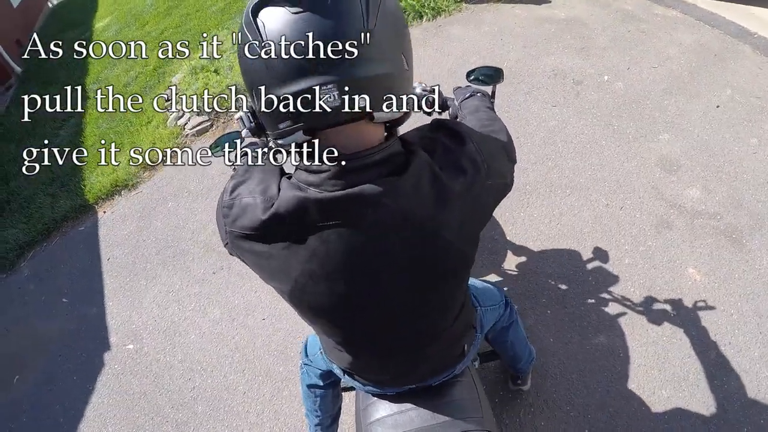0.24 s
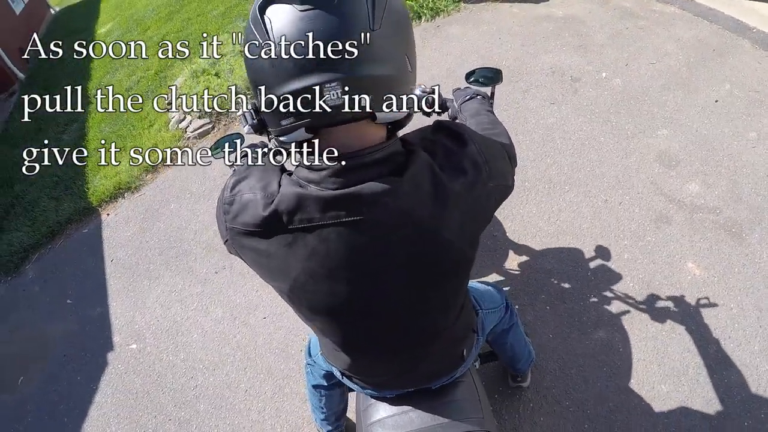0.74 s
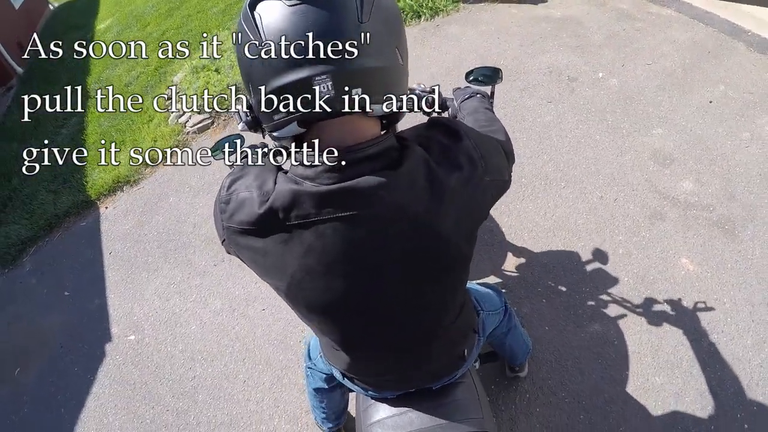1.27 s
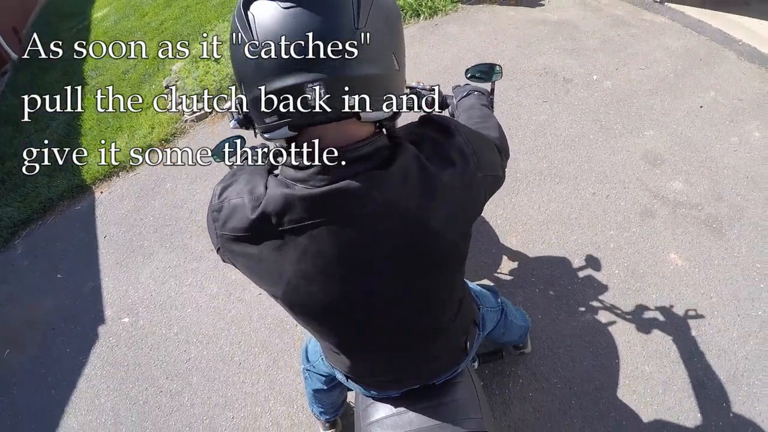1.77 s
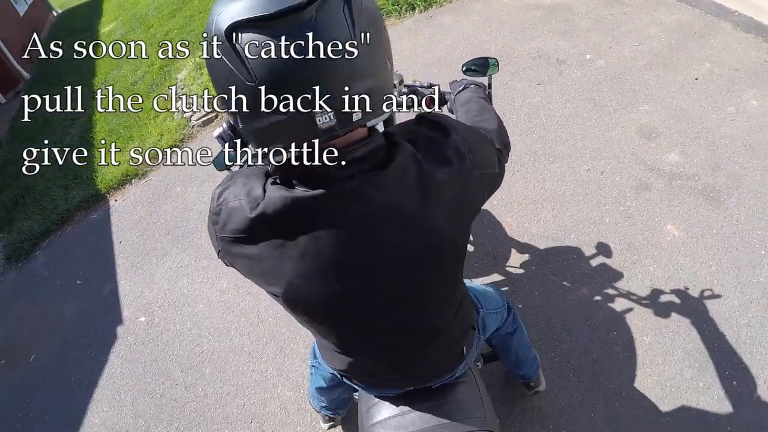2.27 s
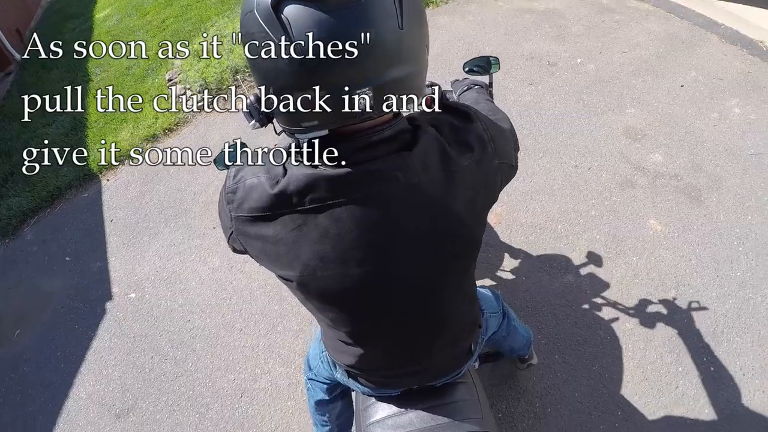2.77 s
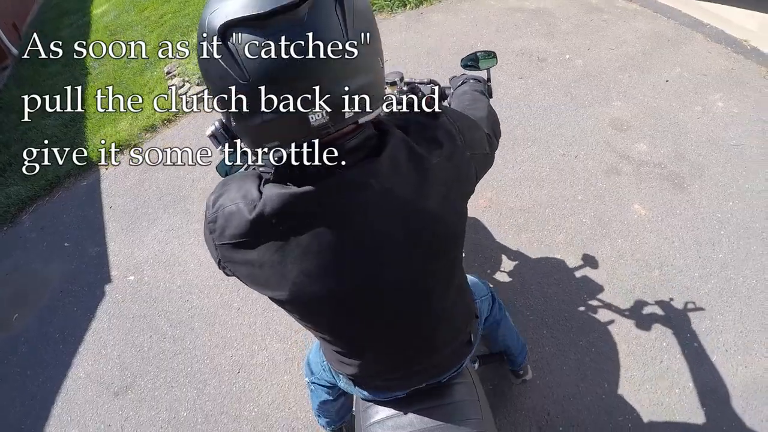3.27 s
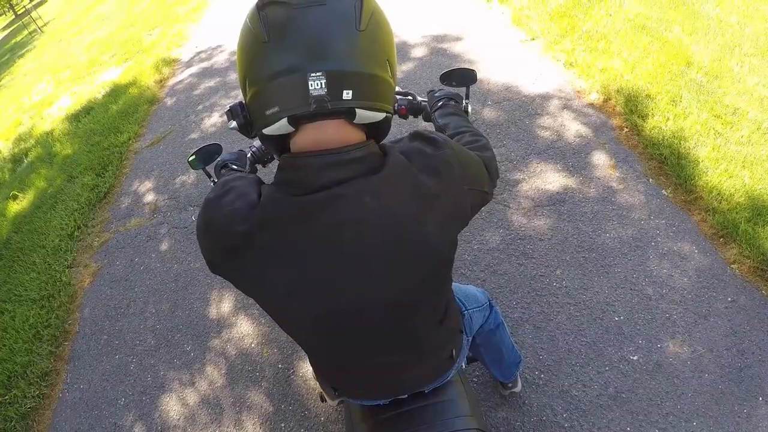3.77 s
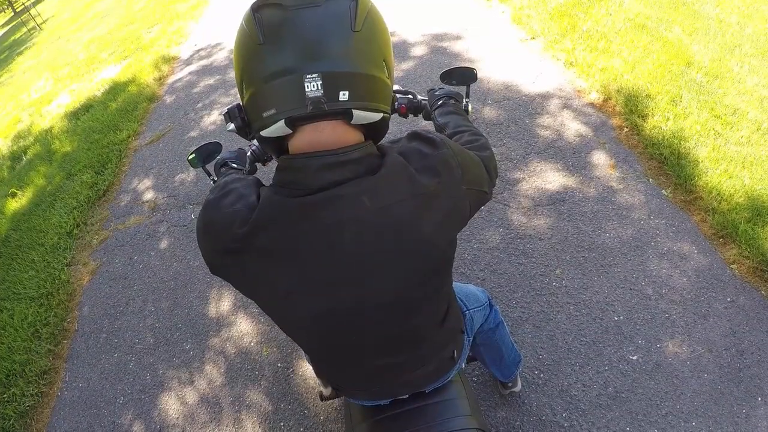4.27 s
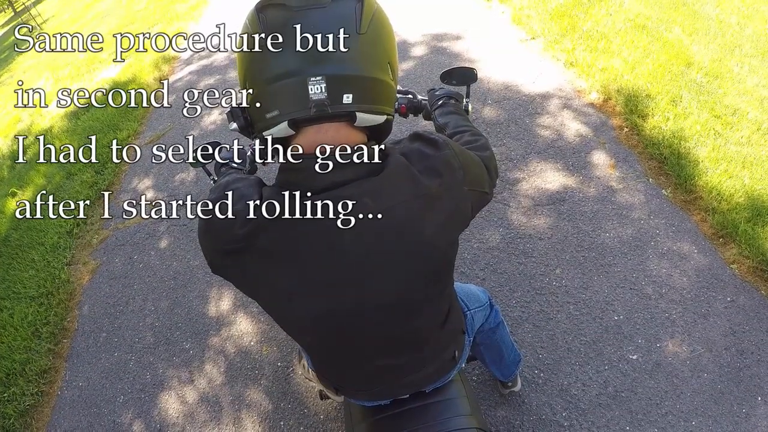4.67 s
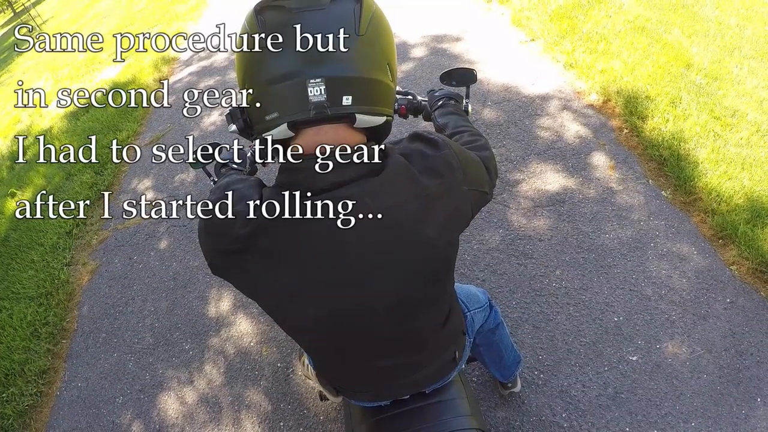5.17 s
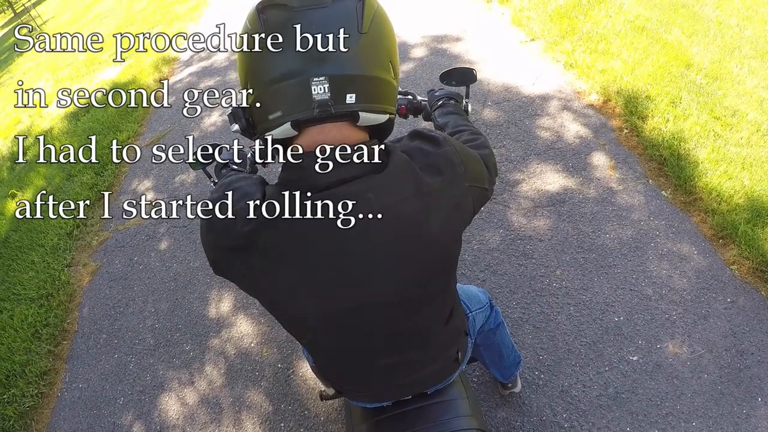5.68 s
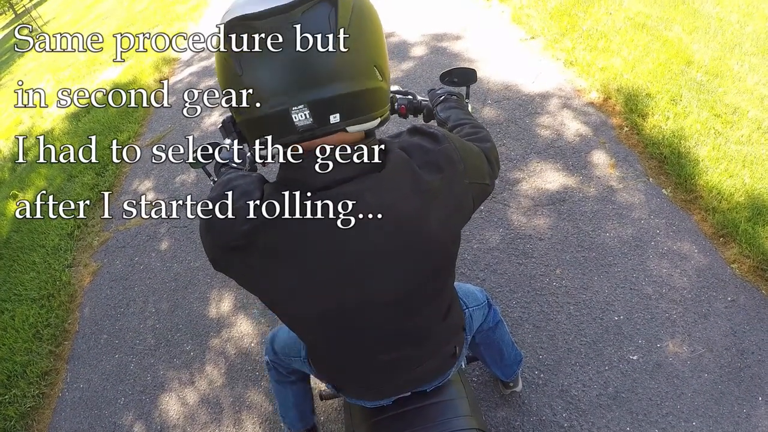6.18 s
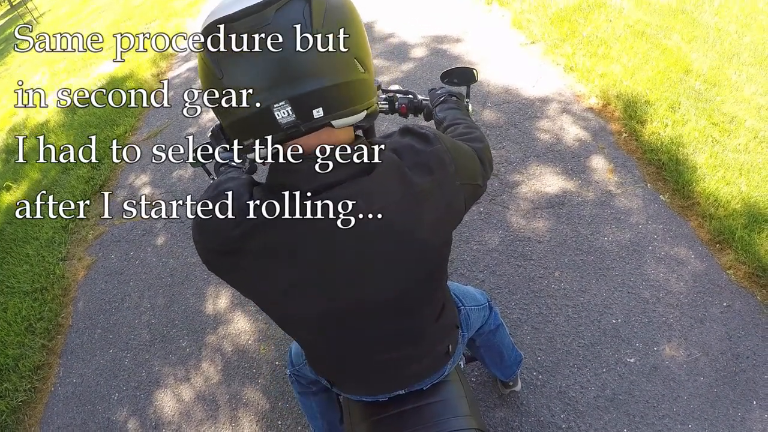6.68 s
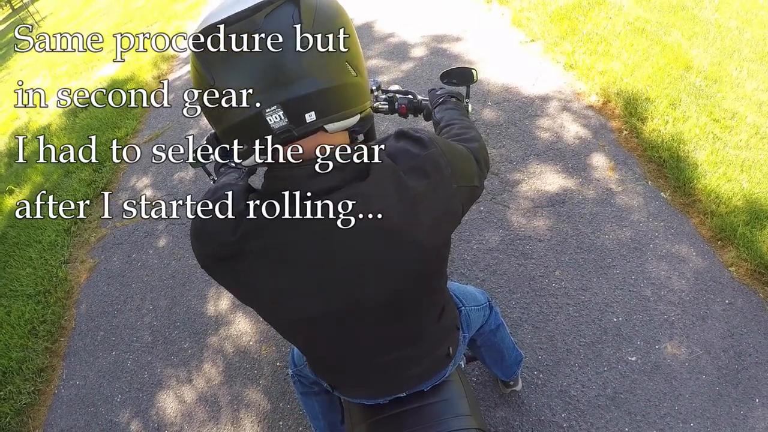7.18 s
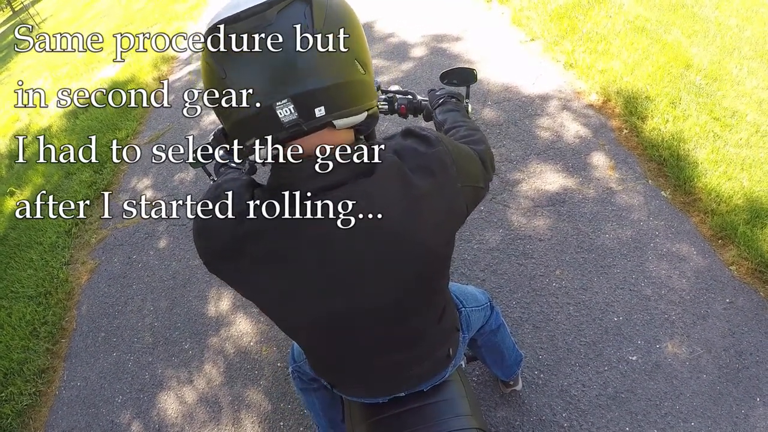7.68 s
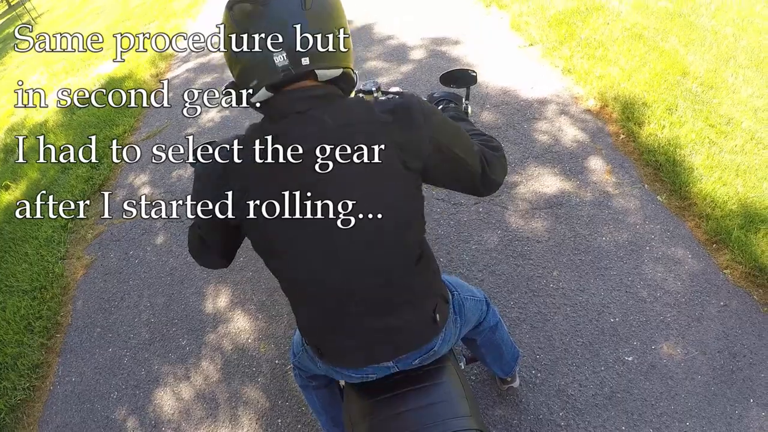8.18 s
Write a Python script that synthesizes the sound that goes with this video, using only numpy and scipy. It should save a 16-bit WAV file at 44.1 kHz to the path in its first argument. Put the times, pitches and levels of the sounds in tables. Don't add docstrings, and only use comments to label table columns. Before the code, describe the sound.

From 0 to 3.48 seconds a twin-cylinder motorcycle engine runs close to a microphone in a housing mounted on the bike. At first it is lumpy, one cylinder firing evenly about seven times a second while the other misfires; from around 0.3 seconds the throttle opens and by 1.5 the chug is fuller and steadier, nearly eight cycles a second. Deep thumps, gas hiss, small spits, clatter and hollow valve knocks mix. At 3.48 it cuts instantly to quiet: soft breeze, faint distant traffic, thin air hiss. Lever clicks come at 3.6-3.7 and 4.1, a strong gear pedal clunk with low frame thud at 4.9, smaller ticks until 5.4, one at 5.9, and a bright click at 7.8. Faint birds whistle and chirp throughout, with buzzy trills mainly after 7. A car swells weakly near 7.1. Jacket cloth rustles around 8.25 and 8.4.

```python
import sys
import numpy as np
from scipy import signal
from scipy.io import wavfile
from scipy.ndimage import uniform_filter1d

SR = 44100
rng = np.random.default_rng(int(sys.argv[2]) if len(sys.argv) > 2 else 0)


def materialize(psi):
    bounded = np.clip(np.atleast_2d(psi).T, -1, 1)
    quanta = np.round(bounded * 32767).astype(np.int16)
    wavfile.write(sys.argv[1], SR, quanta)


def gain_from_db(level_db):
    decades = np.asarray(level_db, float) / 20
    return 10 ** decades


N = 371746
CUT_S = 3.4802

# (front blast time [s], rear blast pressure [relative, negative = misfire sucks gas back],
# valve knock before the front blast [dB], light knock after it [dB])
ENGINE_CYCLES = [(-.1195, 2.2, -40, -40), (.0176, -1.22, -36, -34), (.1554, -.95, -36.5, -34),
                 (.3084, 1.26, -25.5, -33), (.4357, -1.23, -30.5, -32), (.5607, .33, -31, -37.5),
                 (.7007, 1.37, -28.5, -31), (.8333, -1.09, -25.5, -34.5), (.9657, 1.14, -29, -27),
                 (1.095, -1.21, -21, -29), (1.2218, 1.15, -26, -33.5), (1.3491, -.97, -27, -38),
                 (1.4825, 1.27, -25, -28), (1.6133, .44, -27, -32), (1.74, .86, -27.5, -34.5),
                 (1.8686, .72, -27.5, -38), (1.9976, .98, -23.5, -36), (2.1261, .89, -28.5, -34),
                 (2.2513, .58, -27, -35.5), (2.3793, .93, -26, -40), (2.5063, .3, -26, -28.5),
                 (2.632, .88, -30, -32), (2.7608, .92, -24, -27.5), (2.887, .27, -21.5, -29.5),
                 (3.0144, 1.02, -27, -42), (3.1419, .86, -22.5, -34.5), (3.2661, .38, -23, -41),
                 (3.393, 1.08, -26.5, -28.5)]
# (frequency [Hz], width [Hz], level [dB])
HOUSING_MODES = [(656, 83, -17.5), (707, 53.3, 5.5), (802, 157, -6), (1124.6, 45, -4.5), (1330, 29, -18.5),
                 (1558, 25, -4.5), (1876, 19, -11.5), (2331, 120, -16), (2754, 32, -19), (3360, 28, -34.5),
                 (3753, 37, -23.5)]


def evened(x):
    return x / np.sqrt(np.mean(x ** 2) + 1e-20)


def curve(rows):
    return np.interp(np.arange(N) / SR, *np.transpose(rows))


def band(x, lo_hz, hi_hz):
    return signal.sosfilt(signal.butter(2, [lo_hz, hi_hz], "band", fs=SR, output="sos"), x)


def noise(spectrum, patchy_db):
    hz = np.fft.rfftfreq(2048, 1 / SR)
    real, imag, patches = rng.standard_normal((N // 512 + 5, 1025, 3)).T
    patches = uniform_filter1d(patches, 12, 0)
    patches = evened(uniform_filter1d(patches, 6, 1))
    table_hz, table_db = np.transpose(spectrum)
    colour_db = np.interp(np.log(hz + 1), np.log(table_hz + 1), table_db)[:, None]
    spectrogram = (real + 1j * imag) * gain_from_db(colour_db + patchy_db * patches)
    return evened(signal.istft(spectrogram, nperseg=2048, noverlap=1536)[1][:N])


def resonances(x, modes):
    out = np.zeros(len(x))
    for hz, width, db in modes:
        radius = np.exp(-np.pi * width * 1.55 / SR)
        pole = radius * np.exp(2j * np.pi * hz / SR)
        out += gain_from_db(db) * 2 * signal.lfilter([(1 - radius) ** 2], [1, -2 * pole, pole ** 2], x).real
    return out


def train(times, sizes):
    out = np.zeros(N + SR // 10)
    samples = np.round(np.asarray(times) * SR).astype(int) + SR // 10
    np.add.at(out, samples, sizes)
    return out


def struck(impulses, response):
    return signal.oaconvolve(impulses, response)[SR // 10:][:N]


def bursts(times, sizes, rise_s, fall_s):
    t = np.arange(SR // 4) / SR
    shape = (1 - np.exp(-t / rise_s)) * np.exp(-t / fall_s)
    return struck(train(times, sizes), shape / shape.max())


def ring(hz, db, t60):
    t = np.arange(SR) / SR
    return gain_from_db(db - 60 * t / t60) * np.sin(2 * np.pi * hz * t)


def rings(modes):
    return sum(ring(*mode) for mode in modes)


def throttled(s, shut, opened):
    # (time [s], opening [0-1])
    throttle = [
        (0, 0),
        (.28, 0),
        (.45, 0.59),
        (1.3, 0.75),
        (1.9, 1),
        (3.45, 0.91),
    ]
    return shut + (opened - shut) * np.interp(s, *np.transpose(throttle))


def strokes():
    front_s, rear = np.transpose(ENGINE_CYCLES)[:2]
    cycle_s = np.diff(front_s, append=front_s[-1] + .128)
    rear_s = front_s + cycle_s * (.475 + .024 * np.minimum(abs(rear), 1.4))
    front_blast = throttled(front_s, shut=.87, opened=1.18)
    lean_pump, rich_pump, rear_pump, misfire_pump = .45, 1.2, 1.55, .4
    front_pump = lean_pump + (rich_pump - lean_pump) * np.clip(rear, 0, 1)
    rear_pumping = np.where(rear < 0, misfire_pump, rear_pump)
    rear_spit_db = np.maximum(-46 + 23.5 * (np.minimum(rear, 1.3) - 1), -66.5)
    front = np.array([front_s, front_blast, front_pump, np.full(len(rear), -44.5)])
    return np.hstack([front[:, 1:], [rear_s, rear, rear_pumping, rear_spit_db]])


def knocks():
    s, _, firm_db, light_db = np.transpose(ENGINE_CYCLES[1:])
    lag_s = .027 + .006 * rng.uniform(-1, 1, len(s))
    return np.r_[s - .0315, s + lag_s], np.r_[firm_db, light_db]


def exhaust():
    # (frequency [Hz], level [dB], decay t60 [s])
    pipe_modes = [(57.9, 5.6, 0.187), (93.1, 3.3, 0.095), (117.6, -8, 0.13), (149.5, -11, 0.181),
                  (236.3, -3.8, 0.131), (346.5, -13.8, 0.193)]
    puff_s, outlet_rad_per_s = .0019, 485.
    s, blast, pump, _ = strokes()
    pipe = -signal.oaconvolve(train(s, blast), rings(pipe_modes[:2]))
    pipe -= signal.oaconvolve(train(s, np.maximum(blast, 0)), rings(pipe_modes[2:]))
    smooth, cut = np.exp(-1 / (puff_s * SR)), np.exp(-outlet_rad_per_s / SR)
    for _ in range(2):
        pipe = signal.lfilter([1, -1], [1, -cut], pipe)
        pipe = signal.lfilter([1 - smooth], [1, -smooth], pipe)
    silencer = struck(train(s + .002, pump), ring(hz=65.5, db=-20.7, t60=.9))
    return pipe[SR // 10:][:N] - silencer


def flow():
    # (frequency [Hz], width [Hz], level [dB])
    flow_modes = [(33, 12, -50), (128.3, 37, -28.5), (196.6, 46, -34), (234.8, 20, -40), (337, 17, -44.5),
                  (444.4, 32, -43)]
    # (frequency [Hz], level [dB], decay t60 [s])
    header_modes = [(241.45, -22, 0.24), (328, -37, 0.2)]
    # (frequency [Hz], level [dB])
    spit_colour = [(2300, -31.5), (3000, 6), (3800, -9.5), (6000, 6.5), (7600, 0), (9000, -10), (10500, 1),
                   (12000, -18), (13600, -8.5), (16000, -30.5)]
    s, blast, _, spit_db = strokes()
    gas = (.5 + bursts(s, abs(blast), .005, .025)) * rng.standard_normal(N)
    rumble = gain_from_db(20) * resonances(band(gas, 25, 600), flow_modes)

    header_s = np.minimum(s + 0.00399 + .0015 * rng.random(len(s)), CUT_S)
    header_size = np.maximum(blast, 0) * gain_from_db(throttled(s, shut=-7.5, opened=-1))
    header = struck(train(header_s, header_size), rings(header_modes))

    s = s - .0025
    ping_size = gain_from_db(spit_db + 4 * rng.standard_normal(len(s)))
    ping = struck(train(s, ping_size), ring(hz=3000, db=-1.5, t60=0.022))
    spit = gain_from_db(-9) * bursts(s, gain_from_db(spit_db), .001, .003)
    spit += gain_from_db(-20) * bursts(s, gain_from_db(spit_db), .003, .03)
    return rumble + header + ping + spit * noise(spit_colour, patchy_db=3)


def engine_block():
    # (frequency [Hz], level [dB per Hz])
    clatter_colour = [(180, 2), (300, -4.5), (530, -13.5), (950, -24), (1400, -25.5), (2100, -28),
                      (3100, -35), (3750, -38.5), (4050, -42.5), (6400, -42), (7500, -51.5), (10500, -53),
                      (14000, -52.5), (15600, -69)]
    s, blast, *_ = strokes()
    level = gain_from_db(throttled(np.arange(N) / SR, shut=-42, opened=-36.5))
    level *= 0.96 + 0.1 * bursts(s, abs(blast), 0.0018, 0.073)
    ticks = gain_from_db(2.83 * rng.exponential(1, N)) * (rng.random(N) < 800 / SR) * rng.choice([-1, 1], N)
    clatter = gain_from_db(7) * band(noise(clatter_colour, patchy_db=2), 162, 15000)
    clatter += gain_from_db(-5.5) * evened(resonances(ticks, HOUSING_MODES))
    clatter += gain_from_db(-31) * evened(band(band(ticks, 2500, 3800), 2500, 3800))
    sizzle = bursts(s, np.maximum(blast, 0), .003, .02) * band(rng.standard_normal(N), 9000, 15000)
    clatter += gain_from_db(-29.5) * sizzle

    s, knock_db = knocks()
    landing = train(s, gain_from_db(knock_db)) + train(s + 0.002805, gain_from_db(knock_db - 5))
    soft = signal.lfilter(signal.windows.hann(9) / 4, [1], landing[SR // 10:])
    grit = gain_from_db(-29) * bursts(s, gain_from_db(knock_db), .003, .007) * rng.standard_normal(N)
    knock = gain_from_db(40) * resonances(soft + grit, HOUSING_MODES)
    knock += gain_from_db(23) * resonances(grit, [(2430, 370, -4.5), (1190, 300, 2), (2840, 300, -11.5)])
    return level * clatter + knock


def outdoors():
    # (frequency [Hz], level [dB per Hz])
    air_colour = [(20, -3), (50, 4), (130, -6), (256, -16.5), (450, -18.5), (680, -18.5), (1100, -26.5),
                  (1400, -36), (2200, -35), (3500, -36), (5000, -38.5), (8000, -44), (13000, -46.5),
                  (15600, -51.5)]
    # (time [s], level [dB])
    breeze_levels = [
        (3.49, -47),
        (3.62, -47),
        (5, -49),
        (5.35, -50),
        (7.8, -50),
        (8.43, -47.5),
    ]
    # (time [s], swell [dB], half length [s])
    passing_cars = [
        (4.976, 7.5, 0.067),
        (7.09, 3, 0.3),
    ]
    air = noise(air_colour, patchy_db=.7)
    low = signal.sosfiltfilt(signal.butter(2, 250, fs=SR, output="sos"), air)
    high = signal.sosfiltfilt(signal.butter(2, 1500, "high", fs=SR, output="sos"), air)
    t = np.arange(N) / SR
    traffic_db = -58.5 + (t - CUT_S)
    for s, db, half_s in passing_cars:
        traffic_db += db * np.exp(-((t - s) / half_s) ** 2)
    breeze = gain_from_db(curve(breeze_levels) + 5.5) * evened(low)
    return breeze + gain_from_db(traffic_db) * evened(air - low - high) + gain_from_db(-68) * evened(high)


def birds():
    # (start [s], length [s], frequency [Hz], level [dB])
    whistles = [(3.9, .16, 3580, -74), (4.17, .065, 2290, -59), (4.4, .26, 3550, -72),
                (5.3, .05, 2760, -60), (5.77, .05, 2260, -68), (5.82, .09, 3610, -59),
                (6.02, .05, 3600, -65), (7.31, .14, 2730, -68), (7.44, .08, 3980, -62),
                (7.58, .09, 3500, -69), (8.025, .035, 2880, -59)]
    chirps = [(3.52, .02, 2250, -66), (3.8, .05, 5550, -68), (4.275, .025, 3400, -63),
              (4.3, .02, 2830, -62), (5.6, .06, 3080, -68), (5.86, .04, 3200, -62), (6.01, .035, 3300, -64),
              (6.06, .035, 3170, -60), (6.45, .03, 2900, -66), (8.21, .03, 2900, -64),
              (7.22, .08, 3980, -68), (7.735, .035, 4250, -61), (7.93, .045, 4470, -63)]
    slurs = [
        (6.59, .14, 3170, -65),
        (6.9, .2, 3290, -65),
        (7.11, .1, 2950, -64),
    ]
    arches = [
        (3.78, .04, 1750, -63),
        (5.46, .055, 1770, -60),
        (7.12, .045, 1750, -57),
    ]
    dives = [
        (3.82, .025, 2050, -64),
        (7.16, .025, 2150, -63),
    ]
    # (start [s], end [s], frequency [Hz], width [Hz], level [dB])
    buzzes = [
        (7.3, 7.52, 6400, 350, -66),
        (7.56, 7.73, 6450, 300, -66),
        (7.38, 7.52, 5700, 200, -72),
        (7.505, 7.52, 5800, 250, -58),
        (7.1, 7.4, 3100, 500, -70),
        (8.0, 8.25, 2900, 300, -72),
        (5.75, 6.6, 3300, 500, -72),
    ]
    shapes = [(whistles, 1.01, .995), (chirps, 1.08, .9), (slurs, .82, 1.03), (arches, .92, .94),
              (dives, 1.29, .72)]
    out, hush = np.zeros(N), rng.standard_normal(N)
    flutter = gain_from_db(2 * evened(band(rng.standard_normal(N), 8, 40)))
    waver = 1 + .008 * evened(band(rng.standard_normal(N), 10, 60))
    for notes, first, last in shapes:
        bend = np.polyfit([0, .5, 1], [first, 1, last], 2)
        for start, length, hz, db in notes:
            u = np.linspace(0, 1, round(length * SR))
            place = slice(round(start * SR), round(start * SR) + len(u))
            phase = 2 * np.pi * np.cumsum(hz * np.polyval(bend, u) * waver[place]) / SR
            out[place] += gain_from_db(db) * np.sin(np.pi * u) ** .5 * np.sin(phase)
    out *= flutter
    for start, end, hz, width, db in buzzes:
        u = np.clip((np.arange(N) / SR - start) / (end - start), 0, 1)
        out += gain_from_db(db) * np.sin(np.pi * u) ** .5 * evened(band(hush, hz - width, hz + width))
    echoes = rng.standard_normal(6000) * np.exp(-np.arange(6000) / (0.04 * SR))
    return out + gain_from_db(-5) * signal.oaconvolve(out, echoes / np.linalg.norm(echoes))[:N]


def levers():
    # (time [s], level [dB], colour [0 dull, 1 middle, 2 sharp, 3 bright], rattle length [s])
    clicks = [(3.585, -42, 0.71, 0.021), (3.632, -35.5, 2, .007), (3.639, -36.5, .01, 0.014),
              (3.647, -26.5, 1.7, 0.018), (3.695, -23, .2, 0.0085), (3.6954, -18.5, 1.9, 0.0074),
              (3.73, -40, 1.01, 0.012), (4.065, -32, 1.9, 0.017), (4.0784, -22.5, 1.94, 0.0076),
              (4.115, -34, 1.5, 0.01), (4.131, -25.5, 1.8, 0.0094), (4.143, -19.5, 2, 0.0099),
              (4.805, -43, .01, .0057), (4.8835, -12, 1.1, 0.0021), (4.885, -30, 1.5, 0.011),
              (4.9047, -14.5, 1.8, 0.012), (4.9141, -28.5, 0.78, 0.015), (5.041, -49, 0.012, 0.015),
              (5.0514, -29, 1.44, 0.0064), (5.11, -43.5, 1.4, 0.023), (5.147, -35.5, 1.36, 0.019),
              (5.342, -32, 0.013, 0.0039), (5.387, -23, 1.6, 0.012), (5.395, -56, .6, .012),
              (5.909, -25.5, 1.15, 0.0023), (7.8016, -22.5, 3.54, 0.017), (7.812, -42, .01, 0.03)]
    # (frequency [Hz], level [dB], decay t60 [s])
    pedal_modes = [(1950, -41, 0.2), (2170, -42, 0.22), (2270, -15.5, 0.033), (5200, -48.5, 0.097)]
    part_db = np.array([-1.3, -2.5, -4.8, -21])
    fall_db = 8
    dull, middle, sharp, bright = parts = np.zeros((4, N))
    t = np.arange(4000) / SR
    for s, db, colour, length_s in clicks:
        rattle = rng.standard_normal((4, 4000)) * np.minimum(t / 0.0014, 1) * np.exp(-t / length_s)
        shares = gain_from_db(db + part_db - fall_db * abs(np.arange(4) - colour))
        parts[:, round((s - .002) * SR):][:, :4000] += shares[:, None] * rattle
    out = gain_from_db(17) * resonances(dull, HOUSING_MODES[:3])
    out += gain_from_db(24) * resonances(middle, HOUSING_MODES[3:5])
    out += gain_from_db(5.5) * band(band(dull + middle, 270, 1400), 270, 1400)
    out += gain_from_db(18.5) * resonances(sharp, HOUSING_MODES[6:9])
    out += gain_from_db(3) * band(band(sharp, 1300, 2960), 1300, 2960)
    out += gain_from_db(-1) * band(bright, 2700, 9000)
    gear_s = 4.926
    out += struck(train([gear_s - .016], [1]), rings(pedal_modes))
    return out + struck(train([gear_s], [1]), ring(hz=43, db=-27, t60=.7))


def jacket():
    # (frequency [Hz], level [dB per Hz])
    cloth_colour = [(1400, -26), (1900, -20), (2300, -2), (3300, -1), (4500, -13), (6000, -18), (8000, -31),
                    (12000, -33.5)]
    # (time [s], level [dB], decay [s])
    scuffs = [
        (8.245, -46, .035),
        (8.398, -52, .012),
        (4.93, -55, .05),
        (7.801, -53, .006),
    ]
    envelope = sum(bursts([s], [gain_from_db(db)], 0.0015, fall_s) for s, db, fall_s in scuffs)
    return noise(cloth_colour, patchy_db=0.5) * envelope


def scene():
    before = np.clip((CUT_S - np.arange(N) / SR) * SR, 0, 1)
    running = exhaust() + flow() + engine_block()
    quiet = outdoors() + gain_from_db(-2.5) * birds() + levers() + jacket()
    return (before * running + (1 - before) * quiet)[None]


def roll_off(x):
    return signal.sosfilt(signal.butter(12, 15676, fs=SR, output="sos"), x)


def record(dry):
    return roll_off(dry)


dry = scene()
out = record(dry)
materialize(out)
```